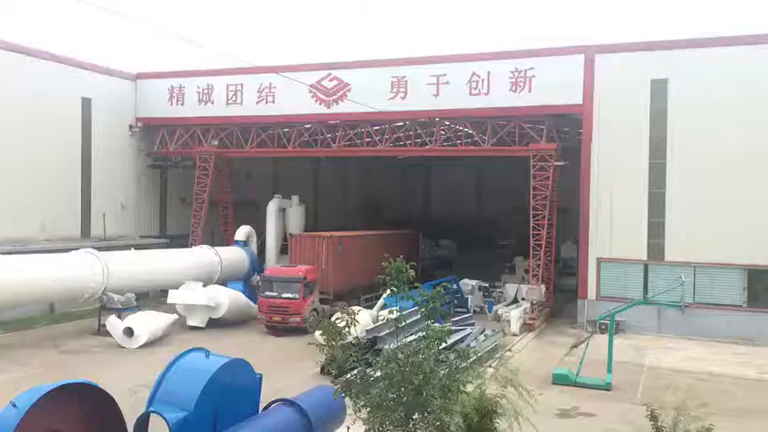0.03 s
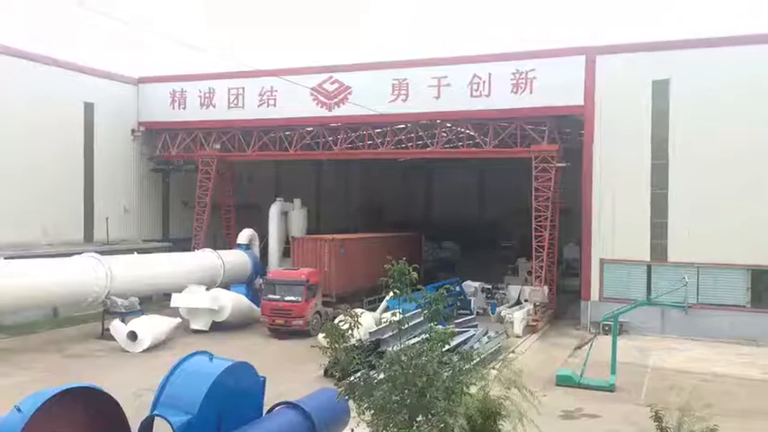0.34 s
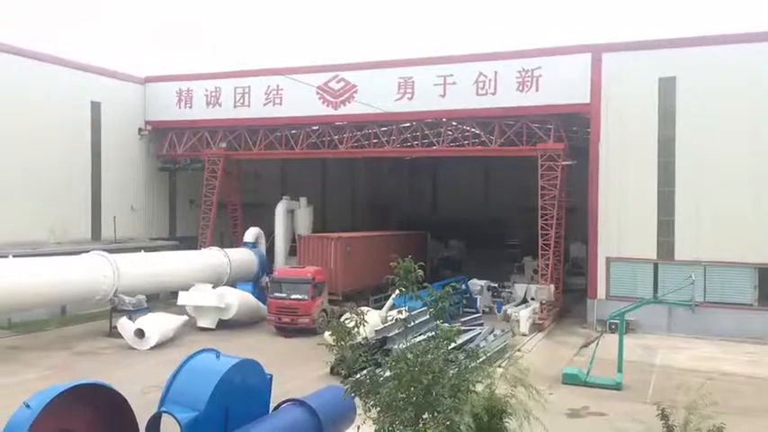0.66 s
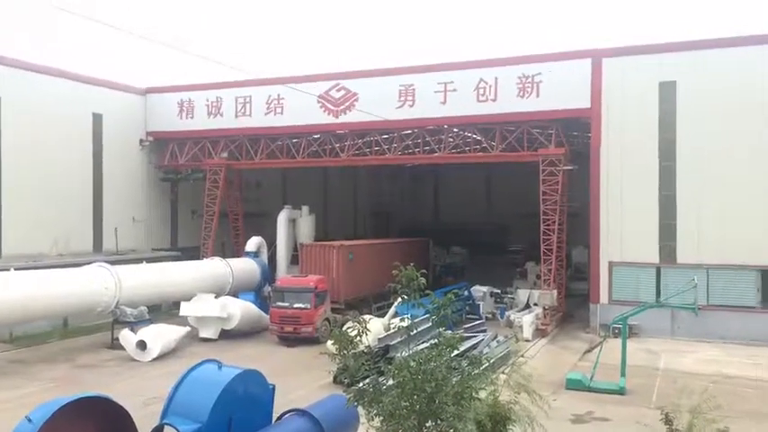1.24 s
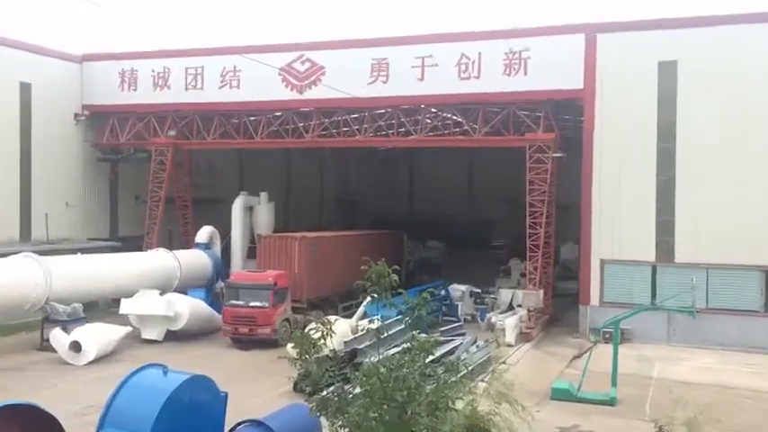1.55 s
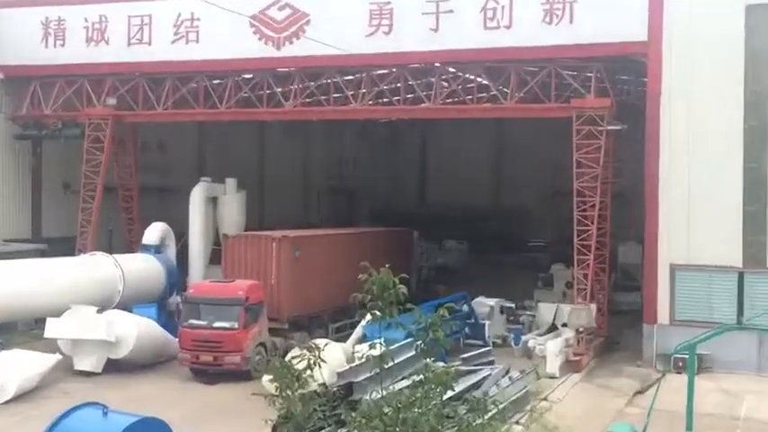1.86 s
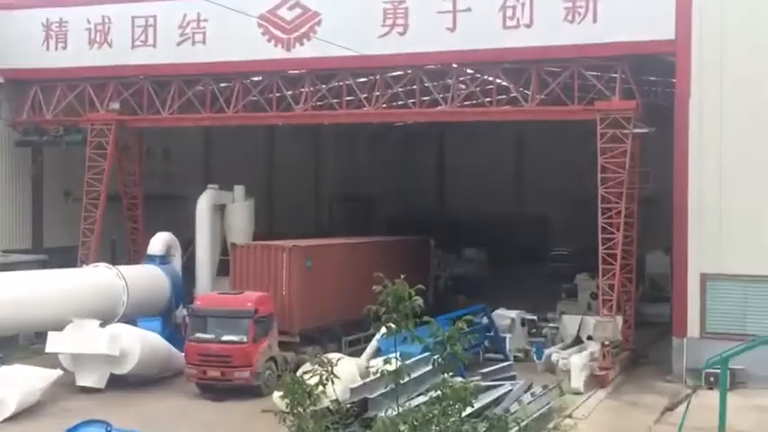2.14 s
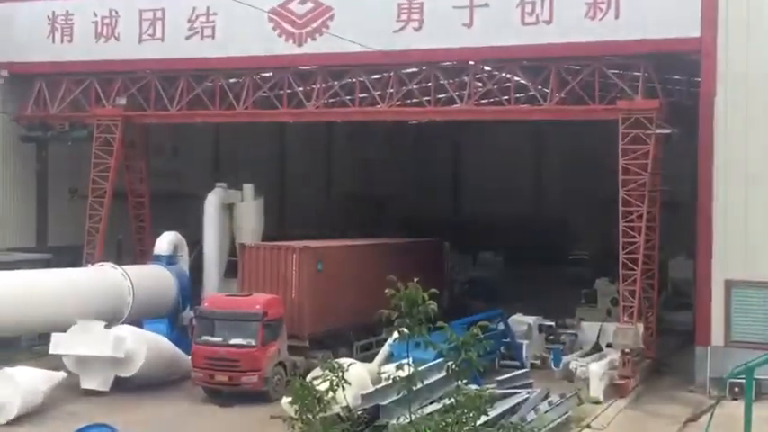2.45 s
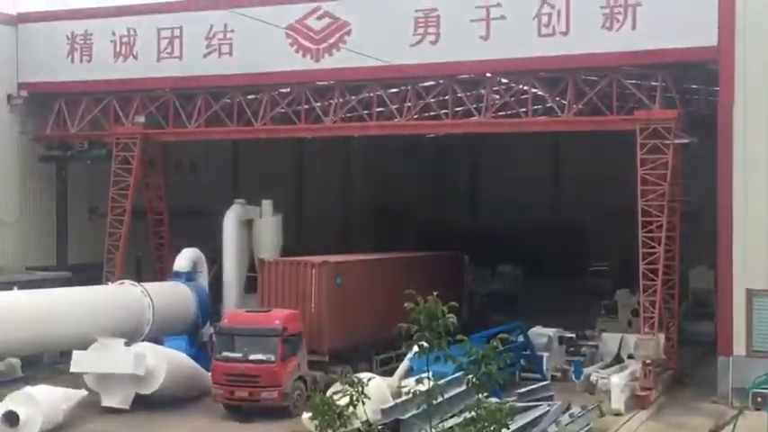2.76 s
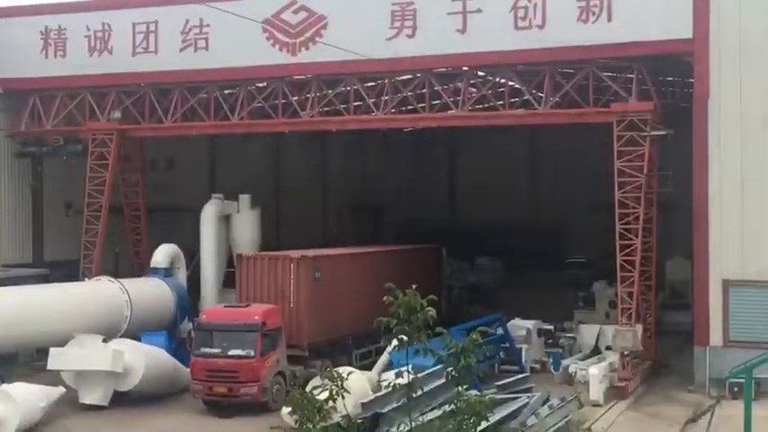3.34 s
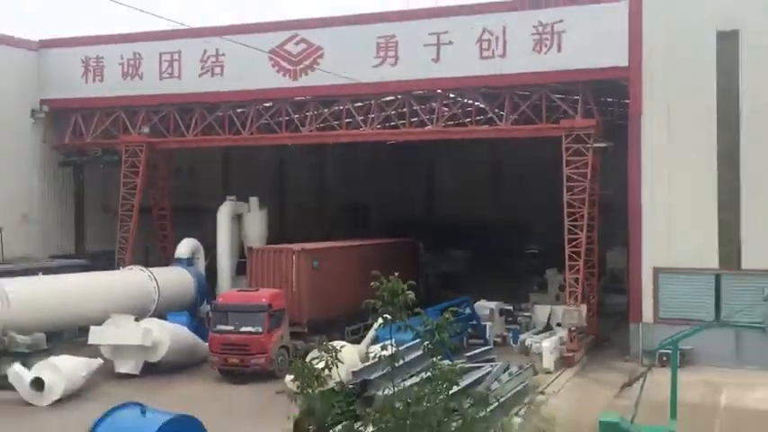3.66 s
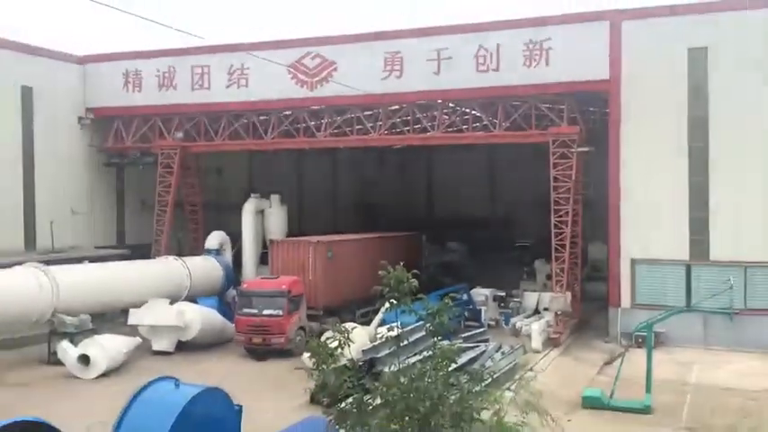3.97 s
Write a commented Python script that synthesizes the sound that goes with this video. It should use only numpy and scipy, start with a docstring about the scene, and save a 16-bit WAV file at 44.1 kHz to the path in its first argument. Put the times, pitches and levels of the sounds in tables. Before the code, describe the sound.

Steady hum of a large fan, with airy hiss and a throbbing idling engine beneath.

```python
"""A blower across a factory yard

A six-bladed blower hums steadily, its uneven blades adding a row of faint, closely spaced tones.
Air rushes through the ducts and makes one narrow note sing on and off. A slow engine throbs
against an electric motor, with a thin whine and a few faint squeaks above them.
The sound cuts in abruptly just after the start."""
import sys
import numpy as np
from scipy import signal
from scipy.fft import rfft, irfft
from scipy.io import wavfile

SR = 44100
rng = np.random.default_rng(int(sys.argv[2]) if len(sys.argv) > 2 else 0)


def materialize(psi):
    """Save the field psi as 16-bit PCM at rate SR to the path in sys.argv[1].

    A 1-D psi becomes a single channel; in a 2-D psi each row is a channel.
    """
    bounded = np.clip(np.atleast_2d(psi).T, -1, 1)
    quanta = np.round(bounded * 32767).astype(np.int16)
    wavfile.write(sys.argv[1], SR, quanta)


N = 176400
t = np.arange(N) / SR


def undb(db):
    """Turn decibels into a factor to multiply by."""
    return 10 ** (np.asarray(db) / 20)


def curve(table, column=1):
    """One column of a table, joined by straight lines in time."""
    rows = np.array(table)
    return np.interp(t, rows[:, 0], rows[:, column])


def noise(gain):
    """White noise shaped by a gain that depends on frequency."""
    hz = np.maximum(np.arange(N // 2 + 1) * SR / N, 1)
    return irfft(rfft(rng.standard_normal(N)) * gain(hz), N)


def wander(rate):
    """A smooth random drift of about 1 either way, changing about rate times a second."""
    path = signal.resample_poly(rng.standard_normal(1024), up=8, down=1)
    return np.interp(t * rate * 8 + 64, np.arange(len(path)), path)


def tone(cycles, db):
    """A pure tone of the given average (rms) level that starts anywhere in its cycle."""
    return np.sqrt(2) * undb(db) * np.sin(2 * np.pi * (cycles + rng.random()))


def resonance(hz, width_hz):
    """Swirling air ringing around one pitch, at an average (rms) level of 1."""
    ring = noise(lambda f: 1 / (1 + (2 * (f - hz) / width_hz) ** 4))
    return ring / ring.std()


# The whine's tones. Each row: pitch in Hz, level in dB.
WHINE_TONES = [(7910, -81), (9884, -74), (10121, -75.5)]

def whine(wander_db=2):
    """The motor's drive gives off thin, high tones."""
    return sum(tone(hz * t, db + wander_db * wander(6)) for hz, db in WHINE_TONES)


# The squeaks. Each row: middle in seconds, pitch in Hz, level at the middle in dB.
SQUEAK_EVENTS = [(3.09, 2860, -48.5), (3.105, 2140, -45), (3.46, 3460, -49)]

def squeaks(fade_s=.021):
    """Short metallic squeaks swell and fade."""
    out = 0
    for middle_s, hz, db in SQUEAK_EVENTS:
        swell = np.exp(-((t - middle_s) / fade_s) ** 2 / 2)
        out += undb(db) * swell * resonance(hz, width_hz=42)
    return out


# How the singing note comes and goes. Each row: time in seconds, level in dB before the trim.
SING_LEVELS = [(.12, -46.5), (.55, -50), (1.05, -68), (1.6, -50.5), (2.45, -49.5), (2.7, -43.5),
               (2.95, -50.5), (4, -48.5)]
# The ducts' weaker notes. Each row: pitch in Hz, width in Hz, level in dB.
DUCT_WHISPERS = [(4985, 64, -67.5), (5225, 100, -71)]

def ducts(sing_trim_db=-2):
    """Flowing air makes the ducts ring: one note sings fitfully and two higher ones whisper."""
    sing = resonance(hz=2108, width_hz=61) * undb(curve(SING_LEVELS) + sing_trim_db)
    whispers = sum(undb(db) * resonance(hz, width) for hz, width, db in DUCT_WHISPERS)
    return sing + whispers


# The air's basic tone colour. Each row: frequency in Hz, level in dB per Hz before trim and boosts.
AIR_COLOUR = [(15, -98), (45, -61), (70, -68), (130, -69.5), (200, -71), (300, -74), (375, -73.5),
              (440, -79.5), (520, -78), (690, -73.5), (850, -73), (1000, -79), (1300, -79), (1600, -77.5),
              (2000, -77.5), (2400, -80.5), (2850, -81), (3600, -81), (4400, -89.5), (5500, -91),
              (7300, -95), (9000, -93), (10100, -95.5), (10400, -101), (10800, -93.5), (12000, -103.5)]
# How the hiss rises and falls. Each row: time in seconds, boost in dB.
HISS_BOOST = [(.12, 3), (.7, 2), (1.3, -0.5), (2.3, -1.2), (3.1, 1), (4, -1)]
# How the top treble rises and falls. Each row: time in seconds, boost in dB.
TREBLE_BOOST = [(.12, 0.7), (.75, 1), (1.4, -.4), (2.3, -1), (2.8, 1), (3.5, 0.5), (4, -1)]
TOP_HZ = 11800

def rushing_air(trim_db=-.5, hiss_hz=3420, hiss_octaves=.33, treble_hz=6500):
    """Air rushes in half-octave bands of noise that swell together and flicker on their own."""
    hz, db = np.array(AIR_COLOUR).T
    swell_db = .4 * wander(7.1)
    out = 0
    for centre_hz in TOP_HZ / np.sqrt(2) ** np.arange(20):
        def band_gain(f):
            colour = undb(np.interp(np.log(f), np.log(hz), db))
            distance = np.clip(2 * np.log2(f / centre_hz), -1, 1)
            return colour * np.cos(np.pi / 2 * distance)  # fades into the bands on either side

        hiss_share = np.exp(-(np.log2(centre_hz / hiss_hz) / hiss_octaves) ** 2 / 2)
        hiss_db = hiss_share * curve(HISS_BOOST)
        treble_db = curve(TREBLE_BOOST) if centre_hz > treble_hz else 0
        band = noise(band_gain)
        flicker_db = .79 * wander(18)
        out += band * undb(trim_db + swell_db + hiss_db + treble_db + flicker_db)
    return out * np.sqrt(SR / 2)  # makes the levels count per Hz


# The engine's firing tones and the motor's hum. Each row: pitch in Hz, level in dB, drift in dB.
THROB_TONES = [(26.8, -45, 2.5), (53.7, -44.5, 0.5), (48.77, -49, 2), (132.8, -53.5, 2),
               (144.8, -59.5, 2.5), (215.7, -62.5, 2), (240.2, -62.5, 4)]
# The engine's third firing tone swells and dies away. Each row: time in seconds, level in dB.
BOOM_LEVELS = [(.12, -52), (.45, -56), (.65, -49.5), (1.35, -43), (1.65, -45.5), (2, -44.5), (3.05, -45),
               (3.45, -51), (4, -55)]

def engine_and_motor(boom_hz=80.6):
    """Low tones of an idling engine and a motor beat against each other, making a throb."""
    hum = 0
    for hz, db, drift_db in THROB_TONES:
        cycles = hz * t + .046 * wander(3.04)
        hum += tone(cycles, db + drift_db * wander(2.06))
    boom = tone(boom_hz * t + .035 * wander(3.13), curve(BOOM_LEVELS))
    return hum + boom


# The blade hum. Each row: time in seconds, then the levels of its four tones in dB, lowest first.
BLADE_HUM = [(0.15, -33.5, -41, -68, -58), (0.67, -34.5, -39, -48.5, -50.5),
             (1.48, -33.5, -38.5, -47.5, -44.5), (1.62, -34, -38.5, -49.5, -47.5),
             (2.89, -33.5, -39, -44.5, -44), (3.92, -34, -39.5, -44, -43.5), (3.97, -34, -39.5, -43, -42.5)]
# The shaft tones that stand out. Each entry: pitch as a multiple of the shaft's turning rate.
STRONG_MULTIPLES = [5, 8, 19, 26, 27, 30, 32, 34, 37, 39, 41, 42, 43, 44, 50, 53, 54, 57, 60, 63]
# The same tones, in the same order. Each entry: level in dB.
STRONG_LEVELS = [-60, -66.5, -64.5, -62, -69, -64.5, -63, -70.5, -63.5, -67.5, -68, -62.5, -62, -70, -65.5,
                 -71, -65.5, -66.5, -67, -72.5]

def blower(blades=6, shaft_hz=58.045, sag_hz_per_s=.004):
    """The blade hum flutters in the moving air; uneven blades add tones at multiples of the shaft rate."""
    speed_hz = shaft_hz - sag_hz_per_s * (t - t.mean())
    wobble = 1 + .0003 * wander(10)
    turns = np.cumsum(speed_hz * wobble) / SR
    out = 0
    for k, flutter_db in enumerate([.28, .82, .74, .5], 1):
        out += tone(k * blades * turns, curve(BLADE_HUM, column=k) + flutter_db * wander(22))
    strong_db = dict(zip(STRONG_MULTIPLES, STRONG_LEVELS))
    for k in range(5, 73):
        faint_db = rng.normal(-75, 3)
        out += tone(k * turns, strong_db.get(k, faint_db) + 3.5 * wander(2.036))
    return out


def scene():
    """All the machinery together, in one channel."""
    return (whine() + squeaks() + ducts() + rushing_air() + engine_and_motor() + blower())[None]


def record(dry):
    """The microphone opens abruptly and the highest treble is cut."""
    start_s, fade_s = .119, .002
    opened = np.clip((t - start_s) / fade_s, 0, 1)
    treble_cut = signal.ellip(10, .2, 80, TOP_HZ, fs=SR, output="sos")
    return signal.sosfilt(treble_cut, dry * opened)


dry = scene()
out = record(dry)
materialize(out)
```